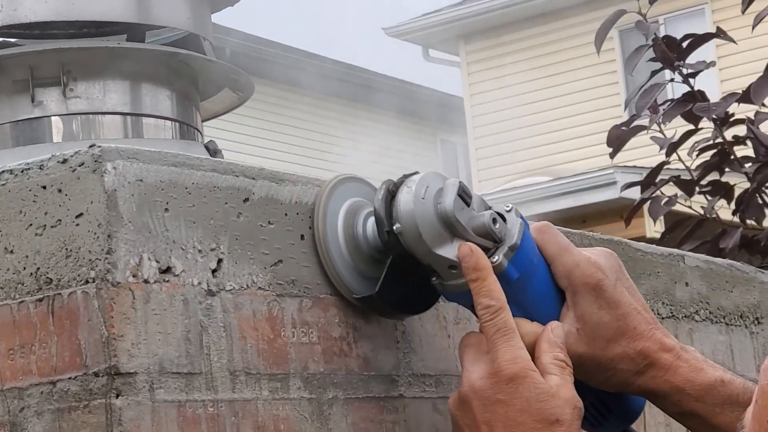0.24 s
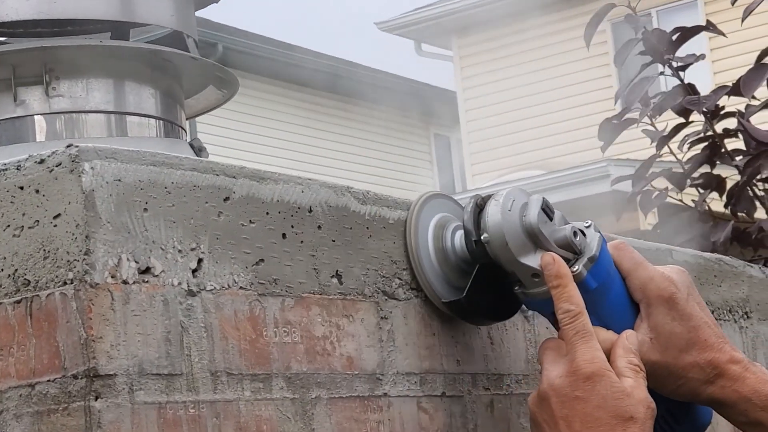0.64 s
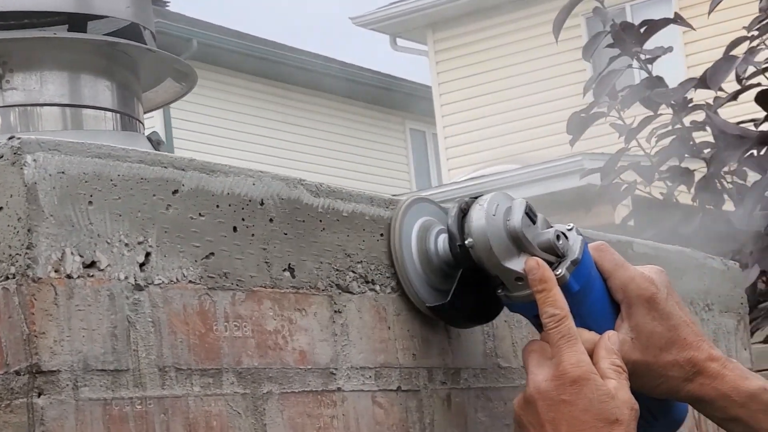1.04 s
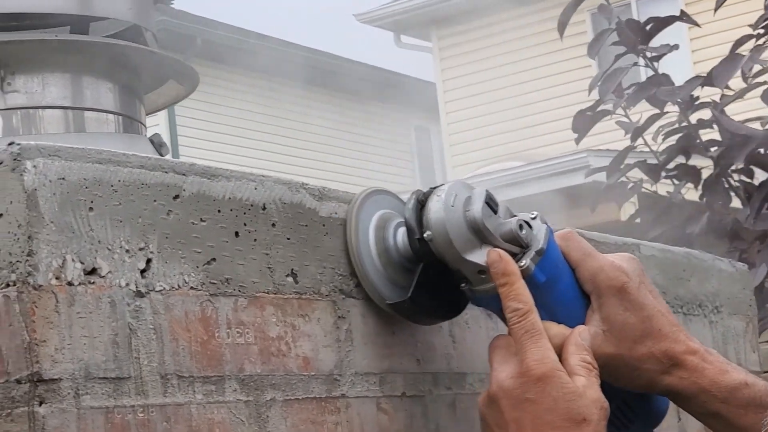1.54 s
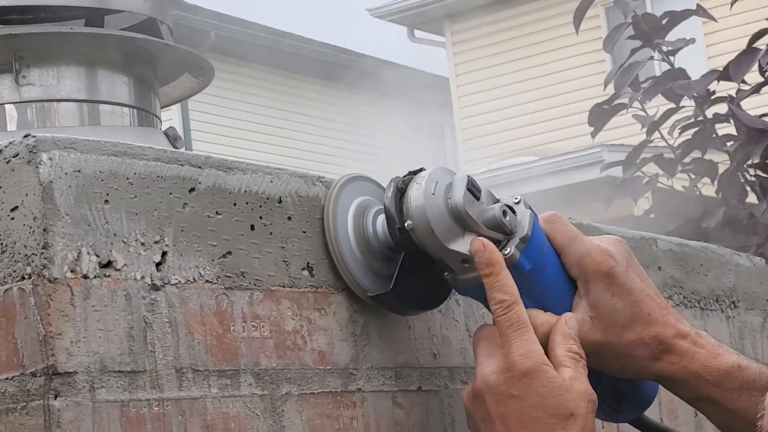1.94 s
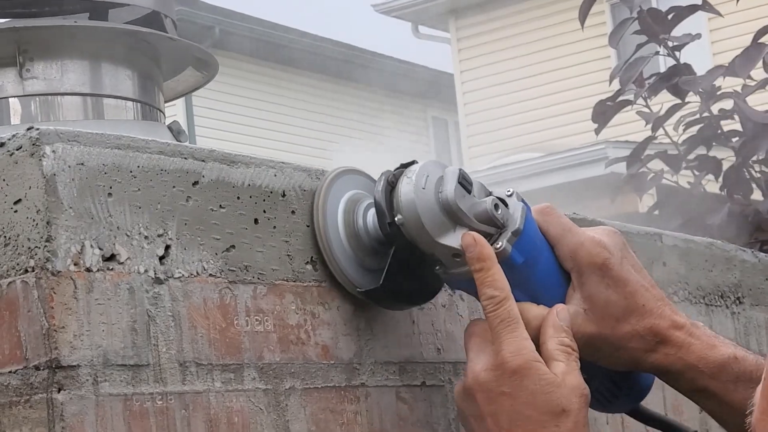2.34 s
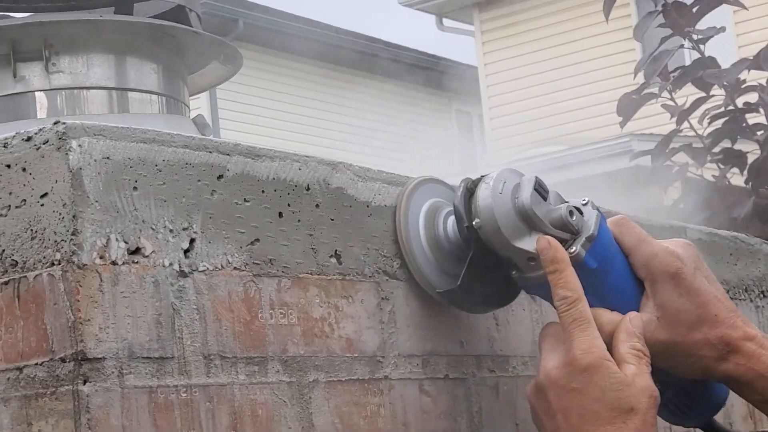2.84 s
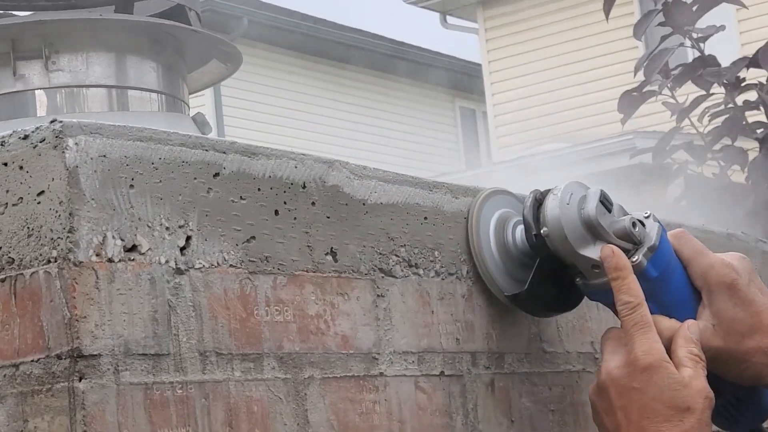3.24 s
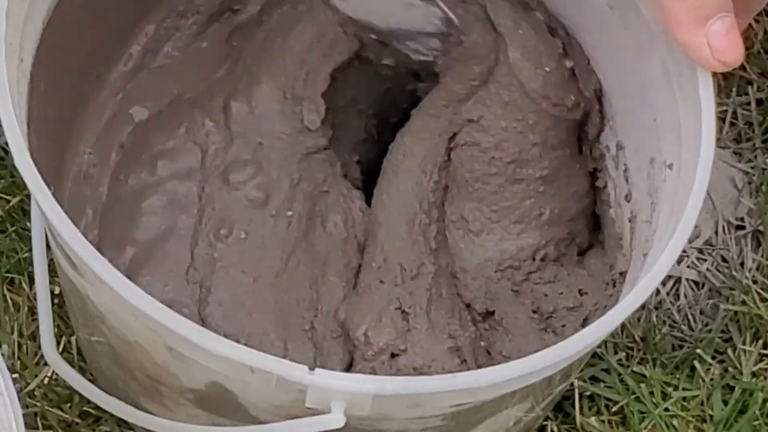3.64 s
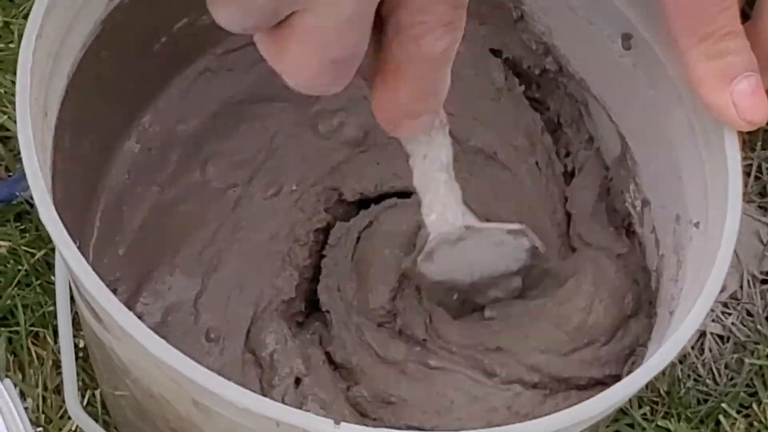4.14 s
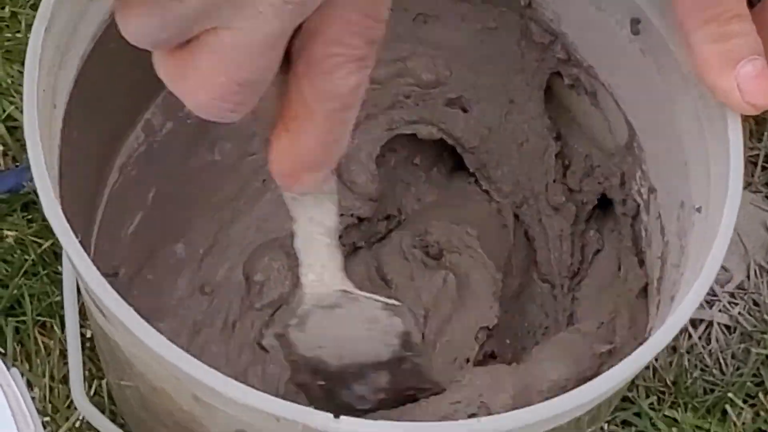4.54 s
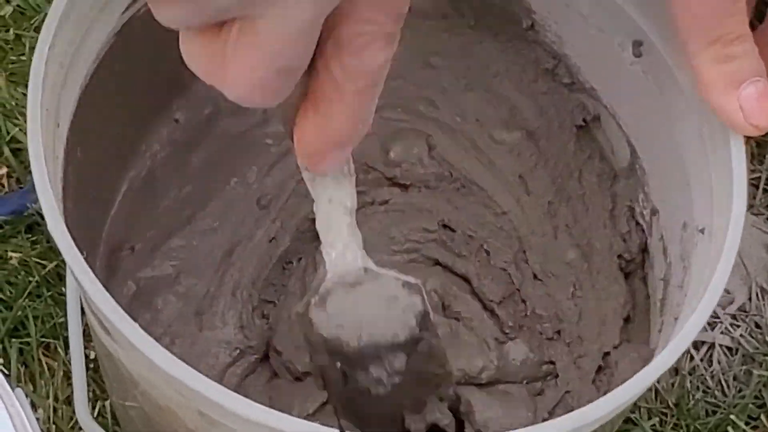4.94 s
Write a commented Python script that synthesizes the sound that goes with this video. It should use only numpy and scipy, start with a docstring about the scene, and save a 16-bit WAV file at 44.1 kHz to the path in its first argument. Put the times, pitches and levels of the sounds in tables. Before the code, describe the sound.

Outdoors and close up, an angle grinder's disc roars over concrete, with a high gear whine and uneven ringing squeals. At about three and a half seconds it cuts to brief silence. A rapid stutter of bright ticks hits only the left side, then a trowel stirs wet, gritty mortar in a plastic bucket, much quieter, with snaps, squelches and small pops over a distant idling engine. The treble differs strongly between left and right.

```python
"""Grit roars under an angle grinder's disc on a concrete ledge outdoors: filtered noise, with ringing disc modes.
Motor and gears whine as gliding sines. It is cut off; after a short silence bright ticks stutter on the left.
Then wet mortar is stirred in a plastic bucket: grainy noise, snaps, wall modes and ringing air pops.
A far engine idles as a wavering harmonic drone over street murmur; low wind noise runs under everything.
Two microphone ports hear the treble very differently."""
import sys
import numpy as np
from scipy import signal
from scipy.fft import rfft, irfft, next_fast_len
from scipy.io import wavfile
from scipy.ndimage import uniform_filter1d

SR = 44100
rng = np.random.default_rng(int(sys.argv[2]) if len(sys.argv) > 2 else 0)


def file_out(sig):
    """Save sig as 16-bit WAV at sys.argv[1]."""
    # one column per channel
    cols = np.atleast_2d(sig).T
    # limit, then scale
    lim = np.clip(cols, -1, 1)
    pcm = np.round(lim * 32767).astype(np.int16)
    wavfile.write(sys.argv[1], SR, pcm)


def how_loud(loudness_db):
    """Turn decibels into a plain amplitude multiplier (0 dB gives 1, 20 dB gives 10)."""
    steps = np.asarray(loudness_db, float) / 20
    return 10 ** steps


N = 228556

# pressure of disc on concrete, as grit in 3.3-4.8 kHz: start_s, level_db
BITE = [(0.0, -31.5), (0.06, -32), (2.3, -31), (2.69, -31.5), (2.7, -30.5), (2.96, -32.5), (3.2, -32),
        (3.43, -33)]
# grit roar colour: freq_hz, left_rel_db_per_hz, right_rel_db_per_hz
GRIT = [(40, -100, -102), (100, -83, -93.5), (263, -79, -83.5), (342, -96, -101.5), (487, -66, -71.5),
        (770, -70.5, -74), (1307, -60.5, -68.5), (1940, -61, -84.5), (3050, -57.5, -67.5),
        (3530, -56, -62.5), (3920, -60.5, -74), (4990, -61.5, -59.5), (5350, -67, -75), (6200, -53.5, -63),
        (7280, -66.5, -61.5), (7960, -75.5, -80.5), (8850, -60.5, -105.5), (9140, -61, -78),
        (12400, -52.5, -63), (14200, -60, -74), (15500, -65, -63.5)]
# grit shared by the ports: freq_hz, likeness_0_to_1
GRIT_ALIKE = [(60, 0.74), (400, 0.47), (1000, 0.5), (2500, 0.38), (6000, 0.18), (15000, 0.07)]
# disc modes: pitch_hz
DISC_HZ = [3187, 2622, 5486, 6383, 4899, 10153, 10324, 9662, 8921, 9096, 13245, 14733]
# modes that swell together: family_index
DISC_FAMILY = [0, 0, 1, 2, 2, 3, 3, 3, 4, 3, 4, 4]
# the same modes: pole_width_hz, level_in_family_db, left_minus_right_db, left_lead_rad
DISC_MODES = [(15, 0, 10, 1.34), (20, -16, 19.5, 10), (18, 1.5, -12, 3.5), (25.2, 2, 2, 1.4),
              (39, -26.5, 16.5, -0.7), (30, 3, 16.5, -0.5), (28, 1.5, 6.5, 4.5), (14, -10, 29.5, 2.5),
              (22, -15.5, 34, -7), (24, -12.5, 32, 7), (20, 1.5, 16.5, 2.5), (29.3, -7.5, -8, -1)]


def disc():
    """Grit under the rim roars and keeps the modes of the disc ringing unevenly."""
    grit_db = in_time(BITE)[0]
    family_gain = squeals()
    grit = at_ports(gritty(0.94, 140), GRIT, GRIT_ALIKE, patchy_db=1.2)
    middle_band = signal.butter(4, [3300, 4800], "band", fs=SR, output="sos")
    middle = signal.sosfilt(middle_band, grit.mean(axis=0))
    out = how_loud(grit_db) * grit / middle.std()
    t = np.arange(N) / SR
    for hz, family, mode in zip(DISC_HZ, DISC_FAMILY, DISC_MODES):
        pole_width_hz, level_db, side_db, lead_rad = mode
        r = np.exp(-np.pi * pole_width_hz / SR)
        noise = [1, 1j] @ rng.standard_normal((2, N))
        swing = signal.lfilter([1], [1, -2 * r, r * r], noise)
        # even out the random swing so that the squeal levels set the loudness
        swing = swing / np.abs(swing) ** .55
        swing_rms = np.sqrt(np.mean(np.abs(swing) ** 2) / 2)
        wave = swing / swing_rms * np.exp(2j * np.pi * hz * t)
        out = out + family_gain[family] * how_loud(level_db) * placed(wave, side_db, lead_rad)
    return out


# ringing of each mode family between squeals: rest_db
FAMILY_REST_DB = [-43.5, -43.5, -38, -43.5, -41.5]
# a family catches on the rim, one list per family: middle_s, peak_db, length_s
SQUEALS = [
    [(.13, -32, 0.48), (.67, -33, 0.26), (.89, -27.5, 0.056), (1.29, -39, 0.11), (1.8, -39, 0.24),
     (2.02, -26, 0.21), (2.32, -37, 0.11), (2.56, -29.5, 0.3), (2.77, -24, .06), (3.2, -25.5, 0.074),
     (3.36, -29, 0.11)],
    [(.07, -23, 0.046), (.72, -39.5, 0.18), (1.6, -30.5, 0.056), (1.98, -43.5, 0.023), (3.03, -20.5, 0.13),
     (3.18, -28, .06), (3.36, -40, 0.12)],
    [(.5, -16.5, 0.17), (1.03, -27.5, 0.074), (1.4, -23.5, 0.69), (1.79, -22, 0.15), (2.03, -11, 0.017),
     (2.17, -20.5, 0.078), (2.28, -19, 0.046), (2.55, -29.5, .25), (2.71, -17, 0.056), (2.8, -22.5, 0.049),
     (3.08, -22, 0.099), (3.23, -25, 0.044)],
    [(.19, -35, .1), (.44, -40, 0.14), (1.76, -26.5, 0.056), (2.03, -33.5, 0.24), (2.42, -27, 0.018),
     (2.63, -33.5, 0.3), (2.77, -40.5, 0.038), (2.87, -42.5, 0.014)],
    [(.19, -35.5, .12), (.63, -44, 0.27), (1.25, -46, 0.065), (1.76, -35, .05), (2.42, -35, 0.045),
     (2.76, -29.5, 0.019), (2.87, -38, 0.03), (3.12, -32.5, 0.49), (3.43, -32, 0.026)],
]


def squeals():
    """Gain of each mode family: an unsteady rest, raised by squeals that swell and fade evenly."""
    edge_fall_db, rest_waver_db = 13, 5.5   # fall from middle to ends; unrest
    t = np.arange(0, N + 100, 100) / SR
    gains = []
    for rest_db, events in zip(FAMILY_REST_DB, SQUEALS):
        swells = sum(how_loud(peak_db - edge_fall_db * np.abs(t - middle_s) / (length_s / 2))
                     for middle_s, peak_db, length_s in events)
        rest = how_loud(rest_db + rest_waver_db * drift(11.0))
        gains.append(rest + np.interp(np.arange(N) / SR, t, swells))
    return gains


# the motor slows under load: start_s, mesh_hz
MOTOR = [(0, 6160), (.3, 6085), (.6, 6035), (.85, 6070), (1.1, 6130), (1.3, 6110), (1.5, 6060), (1.7, 6095),
         (2.05, 6060), (2.35, 6100), (2.55, 6040), (2.8, 6015), (3.1, 6000), (3.43, 5960)]
# gear whine: start_s, mesh_db, twice_mesh_db
WHINE = [(0, -32, -40), (.5, -35, -32), (1, -34, -35), (1.4, -38, -46), (1.6, -30.5, -43), (2, -29.5, -40),
         (2.45, -36, -40), (2.6, -32.5, -34), (3, -30.5, -26), (3.43, -55, -29.5)]
# whine at the ports, mesh then twice mesh: left_minus_right_db, left_lead_rad
WHINE_SIDE = [(4, 0.38), (12, 0.28)]
# slow shaft tones: turns_per_rotor_turn, left_db, right_db, left_lead_rad
SHAFTS = [(0.305, -63, -64, 0.49), (1, -44, -41, 0.37), (1.999, -47, -50.5, 0.27)]


def motor():
    """Rotor and spindle hum; the pinion teeth whine at the mesh rate and its double."""
    pinion_teeth = 12
    mesh_hz = uniform_filter1d(in_time(MOTOR)[0], size=4000)
    whine_db = in_time(WHINE)
    mesh_rad = 2 * np.pi * np.cumsum(mesh_hz) / SR
    out = 0
    for k, (side_db, lead_rad) in enumerate(WHINE_SIDE):
        gain = np.sqrt(2) * how_loud(whine_db[k] + 2.0 * drift(23))
        out = out + gain * placed(np.exp(1j * (k + 1) * mesh_rad), side_db, lead_rad)
    for turns, left_db, right_db, lead_rad in SHAFTS:
        gain = how_loud((left_db + right_db) / 2 + 0.41 * turns * drift(3.1))
        tone = gain * np.exp(1j * turns * mesh_rad / pinion_teeth)
        out = out + np.sqrt(2) * placed(tone, left_db - right_db, lead_rad)
    return out


def ticks():
    """Bright hard ticks at an even pace, each weaker, close enough to overload the left port alone."""
    start_s, gap_s, decay_s = 3.5282, .00346, .0004
    first_db, loss_db = 0, 2
    edge_db, edge_loss_db = -3, 8   # full-band edge, dying faster
    k = np.arange(6)
    s = start_s + gap_s * k
    db = first_db - loss_db * k
    crack = 2.5 * spikes(s, db) + .8 * bursts(s, db, decay_s) * rng.standard_normal(N)
    bright_band = signal.butter(5, (7200, 16500), "band", fs=SR, output="sos")
    bright = signal.sosfilt(bright_band, crack)
    edges = spikes(s, edge_db - edge_loss_db * k ** 2)
    return (bright + edges) * [[1], [0]]


# trowel sliding through mortar: start_s, sand_db, body_db
STIR = [(3.55, -61, -61), (3.63, -54, -69), (3.8, -50.5, -71), (3.93, -49, -55), (4.25, -52, -64),
        (4.4, -49, -62), (4.85, -46, -63), (5.18, -54, -69)]
# hard pushes of the trowel: start_s, end_s, sand_start_db, sand_end_db, body_peak_db
STROKES = [(3.554, 3.613, -37.5, -53, -42.5), (3.721, 3.766, -37, -51, -56), (3.903, 3.915, -33, -44, -45),
           (3.928, 3.996, -40, -43.5, -49), (4.07, 4.156, -50, -58, -74), (4.283, 4.311, -53, -31, -66),
           (4.307, 4.357, -34, -46, -43), (4.426, 4.494, -43, -51, -52), (4.606, 4.67, -51.5, -37, -38),
           (4.664, 4.7, -34, -31.5, -47.5), (4.981, 4.997, -37, -35, -46.5), (4.993, 5.05, -45.5, -47, -51)]
# sand grains and air pockets that snap: start_s, sand_db, body_db, bucket_knock_db
SNAPS = [(3.5615, -48, -28.5, -29), (3.728, -42, -44, -68), (3.899, -42, -54, -34), (3.9365, -54, -49, -50),
         (4.0204, -61, -39, -51), (4.062, -39.5, -41, -49), (4.1094, -38, -58, -58),
         (4.1954, -34.5, -64, -53), (4.2172, -41, -48, -36), (4.272, -34.5, -54, -49),
         (4.3132, -32, -44, -29), (4.381, -30, -35, -39.5), (4.4064, -33, -44, -49), (4.602, -45, -54, -37),
         (4.672, -33.5, -46, -56), (4.6963, -48, -48, -43), (4.858, -30.5, -58, -45),
         (4.9422, -44, -50, -59), (4.985, -36, -53, -42), (5.0084, -45, -50, -37), (5.032, -23.5, -47, -55),
         (5.1385, -45, -69, -61)]
# sand hiss colour: freq_hz, left_rel_db_per_hz, right_rel_db_per_hz
SAND = [(2930, -29, -32), (4125, -4, -16), (5000, -23, -23), (6580, -3.5, -10), (7700, -14.5, -48),
        (8700, 2.5, -60), (10200, 0, -68), (11400, -9, -6), (11930, 7.5, -7), (13400, 1.5, -15),
        (15700, 3, -13)]
# wet body colour: freq_hz, left_rel_db_per_hz, right_rel_db_per_hz
BODY = [(190, -2, -16), (504, 6, 7.5), (1180, 1, -2), (2000, -4, -6.5), (2480, -5.5, -6), (3230, 2, 4),
        (4200, -7, -33), (4800, -21, -19), (6960, -32, -59)]
# noise shared by the ports, also in the street: freq_hz, likeness_0_to_1
STIR_ALIKE = [(60, 0.83), (300, 0.87), (700, 0.18), (1400, 0.067), (3000, 0.12), (12000, 0.15)]
# bucket wall modes: pitch_hz, level_rel_db, t60_s
BUCKET = [(330, -2.5, 0.045), (575, 3, 0.018), (1224, -19, 0.07), (3300, -22, 0.027)]


def mortar():
    """Sand hisses and snaps along the blade; wet mass squelches and knocks the bucket wall."""
    sand_db, body_db = in_time(STIR)
    sand_gain, body_gain = how_loud(sand_db), how_loud(body_db)
    t = np.arange(N) / SR
    for start_s, end_s, first_db, last_db, wet_db in STROKES:
        # a stroke bites at once and lets go fast
        edge = np.clip(np.minimum((t - start_s) / 0.0036, (end_s - t) / 0.013), 0, 1)
        swell = edge * how_loud(np.interp(t, [start_s, end_s], [first_db, last_db]))
        sand_gain = sand_gain + swell
        body_gain = body_gain + swell * how_loud(wet_db - max(first_db, last_db))
    s, snap_db, wet_db, knock_db = np.transpose(SNAPS)
    sand_gain = sand_gain + bursts(s, snap_db, 0.0021)
    body_gain = body_gain + bursts(s, wet_db, .0012)
    grains = crackle(150, spread_db=1.5)
    sand = sand_gain * rms_one(at_ports(grains, SAND, STIR_ALIKE, patchy_db=1.0))
    body = body_gain * rms_one(at_ports(grains, BODY, STIR_ALIKE, patchy_db=1.5))
    strength_db = rng.normal(0, 0.89, (len(SNAPS), len(BUCKET)))
    knocks = 0
    for k, (hz, level_db, t60_s) in enumerate(BUCKET):
        clicks = spikes(s, knock_db + level_db + strength_db[:, k])
        knocks = knocks + ring(clicks, hz, t60_s)
    # a low thud as the stirring sets in
    thud_s, thud_db, thud_hz, thud_t60_s = 3.554, -25.5, 81.4, 0.059
    thud = ring(spikes([thud_s], [thud_db]), thud_hz, thud_t60_s)
    return sand + body + knocks + thud


# air pockets that pop as the mortar lets go: start_s, pitch_hz, level_before_swell_db
POPS = [(3.554, 1030, -28), (3.575, 730, -40), (4.020, 2210, -37), (4.09, 1320, -37), (4.316, 3320, -16),
        (4.436, 2050, -27.5), (4.602, 1053, -37), (4.640, 1820, -26.5), (4.995, 1100, -41),
        (5.033, 1395, -33)]


def pops():
    """Each pocket swells quickly and rings some cycles at its own pitch."""
    cycles_to_60_db, swell_s = 32, 0.0026
    s, hz, db = np.transpose(POPS)[:, :, None]
    t = np.arange(SR // 10) / SR
    decay = how_loud(db - 60 * t * hz / cycles_to_60_db)
    swell = 1 - np.exp(-t / swell_s)
    waves = decay * swell * np.sin(2 * np.pi * hz * t)
    out = np.zeros(N + SR)
    for start, wave in zip((s[:, 0] * SR).astype(int), waves):
        out[start:start + len(wave)] += wave
    return out[:N]


# engine orders: multiple_of_idle, level_rel_db
IDLE_ORDERS = [(1, 4), (1.67, -14), (2.5, -16.5), (3, -25), (3.326, -19)]
# the drone dips briefly: middle_s, depth_db, half_width_s
IDLE_DIPS = [(3.95, 8, 0.045), (4.15, 4, 0.021), (4.315, 10, .025), (4.495, 6, .025), (4.958, 24, 0.018)]


def far_engine():
    """A wavering low drone: sines at multiples of the idle pitch, each slightly unsteady."""
    idle_hz, idle_db, waver_db = 73.3, -47, 2.5
    t = np.arange(N) / SR
    dips_db = sum(db * np.exp(-((t - s) / width_s) ** 2) for s, db, width_s in IDLE_DIPS)
    level_db = idle_db + waver_db * drift(3.2) - dips_db
    orders = sum(how_loud(db + 1.5 * drift(40)) * np.sin(k * 2 * np.pi * idle_hz * t + 0.38 * drift(10))
                 for k, db in IDLE_ORDERS)
    return np.sqrt(2) * how_loud(level_db) * orders


# murmur colour: freq_hz, left_rel_db_per_hz, right_rel_db_per_hz
STREET = [(60.4, 10, -1), (200, 0.5, 5), (504, 4, 2.5), (980, -4, -4), (1540, -8, -12), (2330, -41, -31),
          (5000, -31, -44), (15000, -38, -75)]


def street():
    """Dull murmur of the neighbourhood: coloured noise whose bands waver."""
    level_db = -53.5
    murmur = at_ports(rng.standard_normal((3, N)), STREET, STIR_ALIKE, patchy_db=5.0)
    return how_loud(level_db) * rms_one(murmur)


# wind band: low_hz, high_hz
WIND_HZ = (42, 160)
# wind strength: start_s, level_db
GUSTS = [(0, -82), (.8, -78), (1.2, -72), (2.4, -66), (3.4, -60), (3.6, -53), (4.2, -53.5), (5.18, -54.5)]


def wind():
    """Lumpy low noise, its own at each port."""
    lumps = rng.standard_normal((2, N)) * how_loud(7.0 * np.array([drift(9), drift(9)]))
    low = signal.sosfilt(signal.butter(2, WIND_HZ, "band", fs=SR, output="sos"), lumps)
    return how_loud(in_time(GUSTS)[0]) * rms_one(low)


def rms_one(x):
    """Scale to rms 1 of the mean over channels."""
    return x / np.sqrt(np.mean(np.mean(np.atleast_2d(x), axis=0) ** 2) + 1e-20)


def in_time(rows):
    """Columns of a curve at every sample."""
    s, *columns = np.transpose(rows)
    return [np.interp(np.arange(N) / SR, s, c) for c in columns]


def drift(rate_hz):
    """Slow chance of rms 1: low-passed noise made at every 40th sample, then interpolated."""
    r = np.exp(-80 * np.pi * rate_hz / SR)
    noise = rng.standard_normal(N // 40 + 2002)
    slow = signal.lfilter([1], [1, -2 * r, r * r], noise)[2000:]
    return np.interp(np.arange(N) / 40, np.arange(len(slow)), rms_one(slow))


def gritty(spread_db, rate_hz):
    """Three white noises whose short grains vary in strength together."""
    return rng.standard_normal((3, N)) * how_loud(spread_db * drift(rate_hz))


def crackle(per_s, spread_db):
    """Three white noises with sparse sharp grains of wet sand standing out of them."""
    sizes = how_loud(spread_db * np.minimum(rng.exponential(1, N), 3.0))
    hits = sizes * (rng.random(N) < per_s / SR)
    decay_s = 0.00049
    grains = signal.lfilter([1], [1, -np.exp(-1 / (decay_s * SR))], hits)
    return rng.standard_normal((3, N)) * (1 + 2.0 * grains)


def at_ports(three, spectrum, alike, patchy_db):
    """One shared and two private signals, coloured per port; each band flickers by itself."""
    size = next_fast_len(N)
    log_hz = np.log(np.arange(size // 2 + 1) * SR / size + 1)
    points, like = np.array(spectrum, float), np.array(alike)
    share = np.clip(np.interp(log_hz, np.log(like[:, 0]), like[:, 1]), 0, 1)
    gain_db = [np.interp(log_hz, np.log(points[:, 0]), points[:, c], left=-150, right=points[-1, c])
               for c in (1, 2)]
    common, *own = rfft(three, size)
    both = how_loud(gain_db) * (np.sqrt(share) * common + np.sqrt(1 - share) * np.array(own))
    centres = np.log(np.geomspace(60, 16000, num=8))
    out = 0
    for k in range(len(centres)):
        band = np.interp(log_hz, centres, np.arange(len(centres)) == k)
        out = out + irfft(both * np.sqrt(band), size)[:, :N] * how_loud(patchy_db * drift(6.0))
    return out


def placed(wave, side_db, lead_rad):
    """A complex narrow tone reaches the two ports with a level and phase difference."""
    level = how_loud(np.array([[.5], [-.5]]) * side_db)
    turn = np.exp(1j * lead_rad * np.array([[1], [0]]))
    return np.real(wave * level * turn)


def spikes(s, db):
    """One-sample clicks at the given times."""
    clicks = np.full(N, 1e-18)
    clicks[np.round(np.array(s) * SR).astype(int)] = how_loud(np.array(db))
    return clicks


def bursts(s, db, decay_s):
    """Envelope of sharp onsets that die away."""
    return signal.lfilter([1], [1, -np.exp(-1 / (decay_s * SR))], spikes(s, db))


def ring(clicks, hz, t60_s):
    """A unit click sets a decaying sine of starting height 1 ringing."""
    r, w = how_loud(-60 / (t60_s * SR)), 2 * np.pi * hz / SR
    return signal.lfilter([0, np.sin(w)], [1, -2 * r * np.cos(w), r * r], clicks + 1e-18)


# fade out and in: start_s, level_db
CUT = [(3.435, 0), (3.438, -24), (3.45, -38), (3.462, -55), (3.475, -90), (3.52, -90), (3.53, -40),
       (3.555, 0)]


def scene():
    """The grinder until the silence, the bucket after it; wind under both, ticks outside the fade."""
    fade = how_loud(in_time(CUT)[0])
    first = np.arange(N) < 3.5 * SR   # switch inside the silence
    grinder = motor() + disc()
    bucket = mortar() + pops() + far_engine() + street()
    return fade * (np.where(first, grinder, bucket) + wind()) + ticks()


def roll_off(x):
    """The treble ends steeply here."""
    return signal.sosfilt(signal.butter(12, 17010, fs=SR, output="sos"), x)


def record(dry):
    """Peaks overload, then the top is cut."""
    cutoff_hz = 15760
    taps = signal.firwin(401, cutoff_hz, fs=SR)[None]
    overloaded = np.clip(dry, -1.3, 1.3)
    mix = signal.fftconvolve(overloaded, taps, "same", axes=1)
    return roll_off(mix)


dry = scene()
out = record(dry)
file_out(out)
```